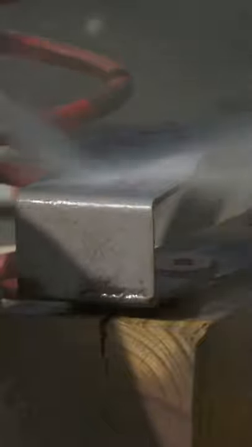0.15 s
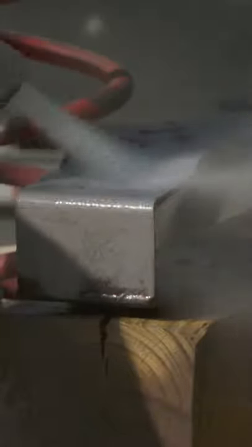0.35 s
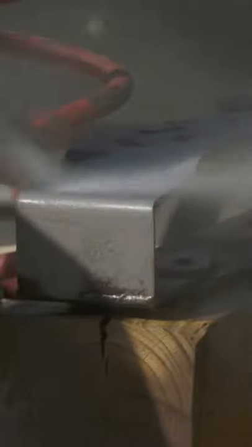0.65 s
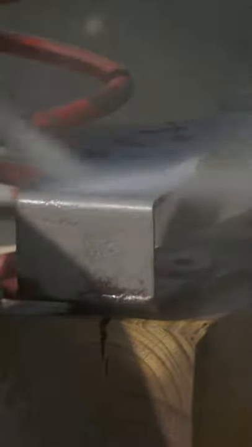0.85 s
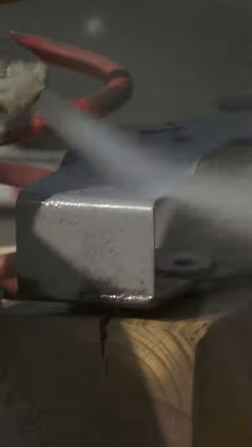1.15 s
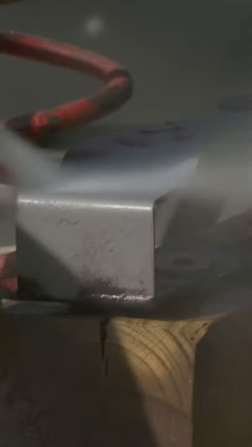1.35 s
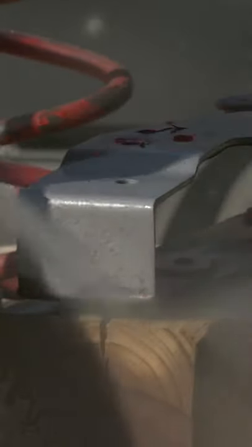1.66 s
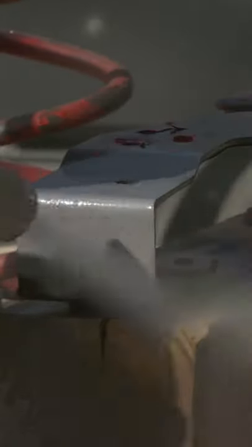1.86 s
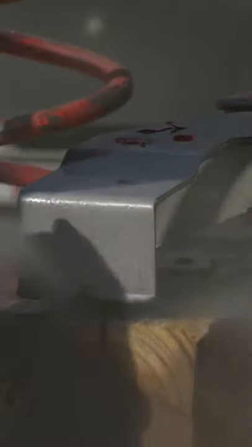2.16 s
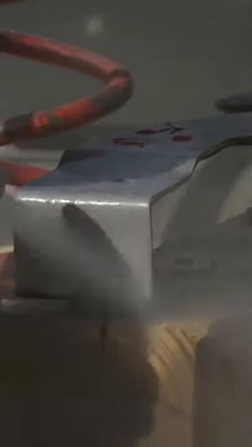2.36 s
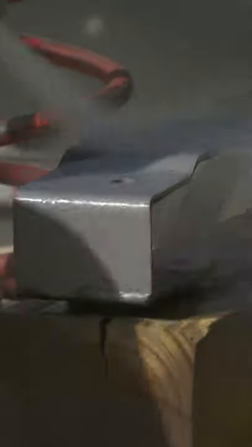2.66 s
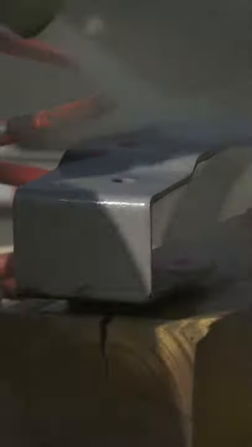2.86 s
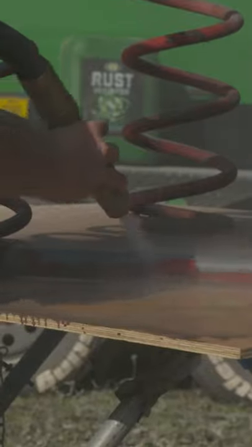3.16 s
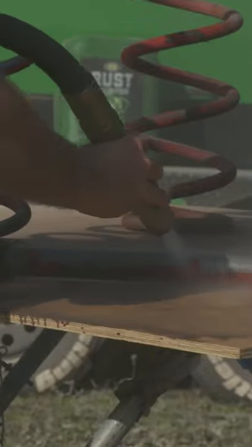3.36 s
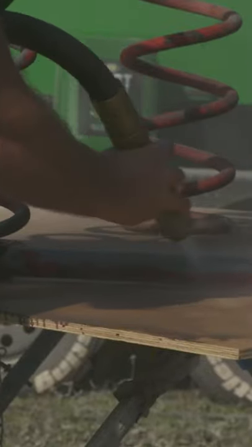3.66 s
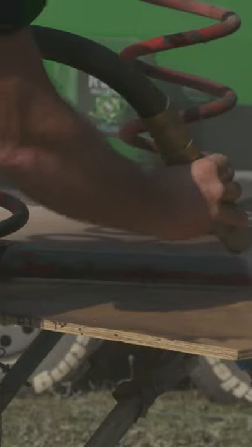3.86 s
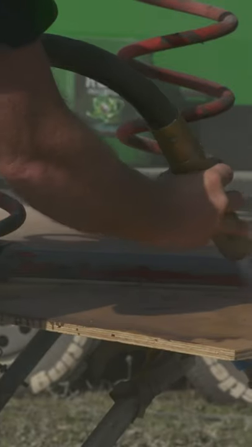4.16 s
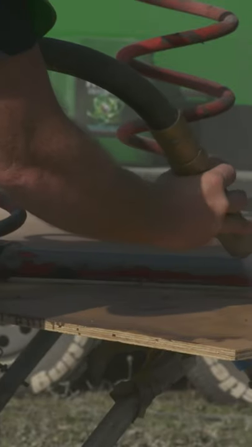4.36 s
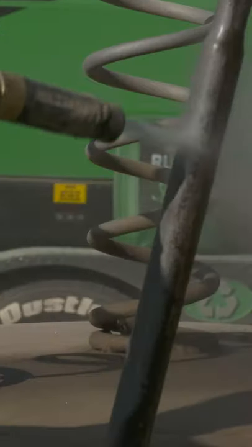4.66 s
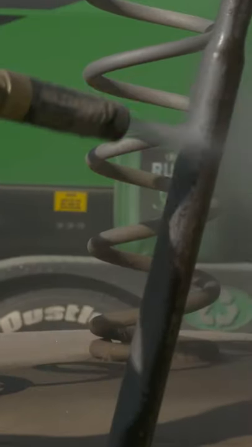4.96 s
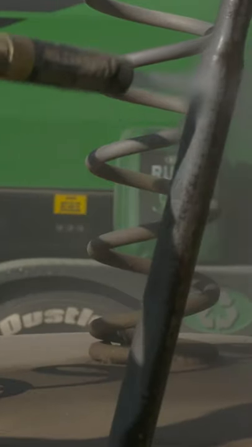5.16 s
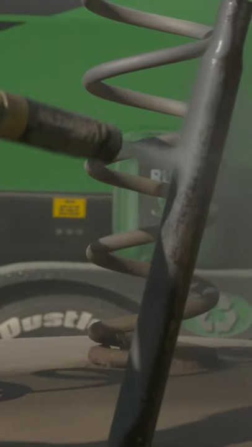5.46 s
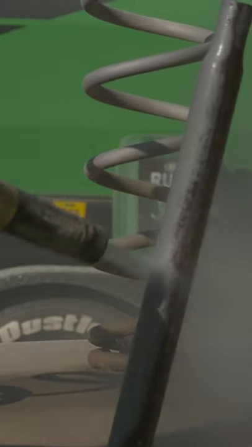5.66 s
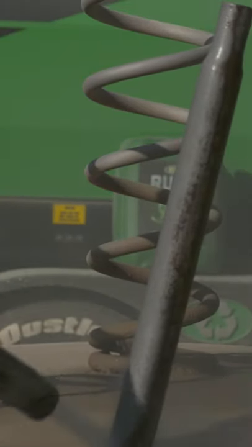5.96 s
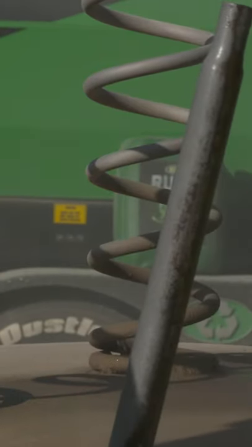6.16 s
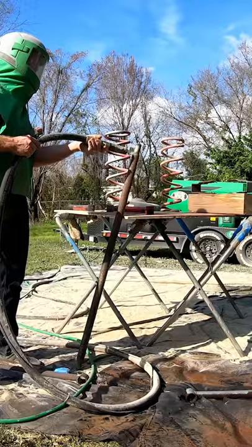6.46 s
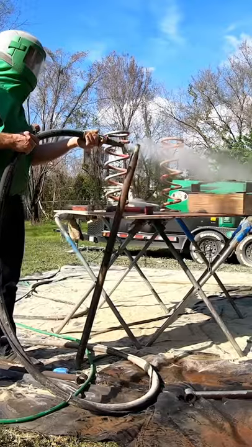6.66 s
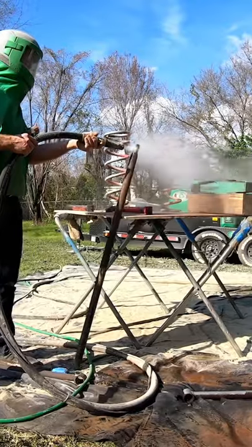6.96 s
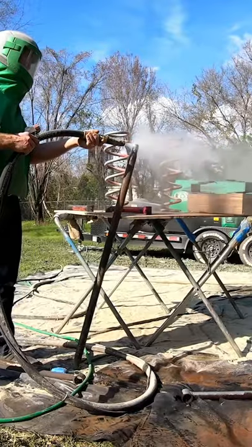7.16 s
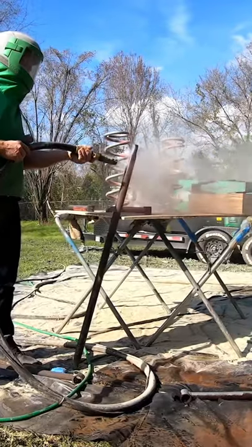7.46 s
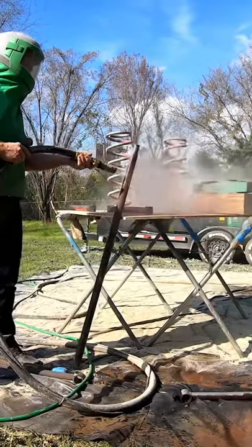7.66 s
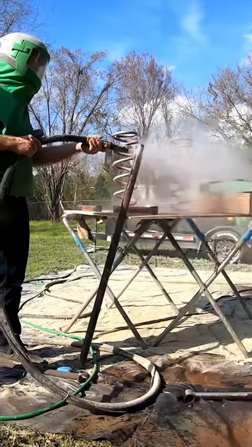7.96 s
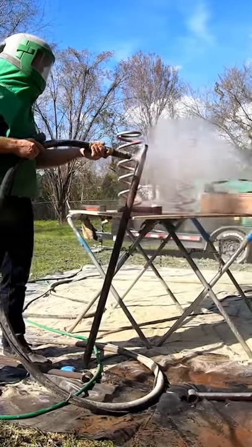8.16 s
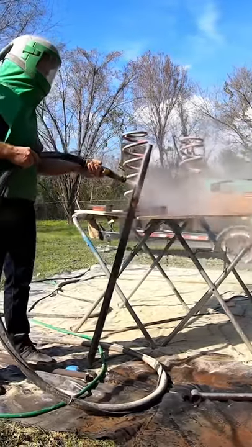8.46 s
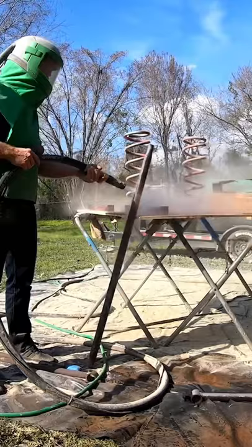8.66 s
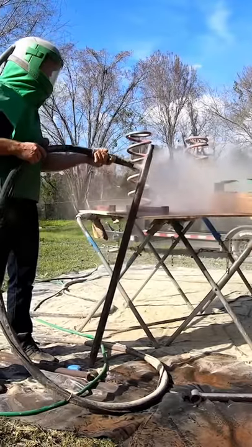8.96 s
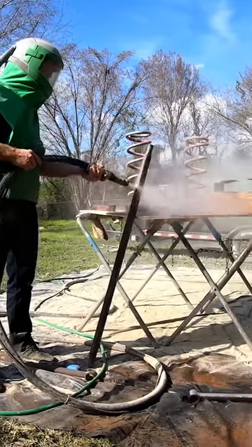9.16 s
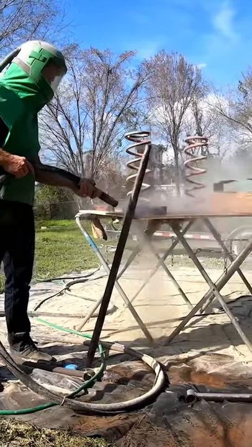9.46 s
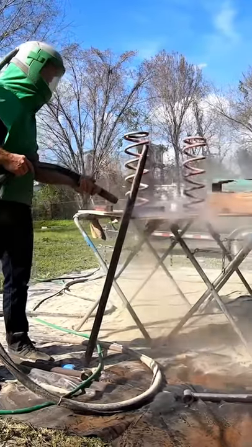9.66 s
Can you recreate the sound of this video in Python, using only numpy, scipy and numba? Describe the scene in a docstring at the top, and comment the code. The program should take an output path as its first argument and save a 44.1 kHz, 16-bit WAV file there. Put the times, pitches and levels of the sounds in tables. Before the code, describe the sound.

Wet grit blasts steel parts outdoors. A dull, close, continuous roar with shifting hollow rings comes first, cutting abruptly at about 4.6 seconds to a thin, quieter, smooth hiss. Then a loud blast bursts in with a low rush, harsh and bright, while a compressor engine rises from idle to a steady drone. Both channels carry the same sound from one microphone.

```python
"""A nozzle blasts water and grit at steel parts outdoors, heard from changing places.
First comes a dull, close roar with ringing bands, over a thin hiss from further off; then the hiss is alone.
Last, a loud blast starts up and its compressor engine climbs from idle towards full speed, joined by a hum.
The jet and grit are flickering noise, the rings are filtered noise and the engine is mostly sine tones.
Late copies off the table top and nearby things colour the jet."""
import sys
import numpy as np
from scipy import signal
from scipy.fft import rfft, irfft, next_fast_len
from scipy.io import wavfile
from scipy.ndimage import uniform_filter1d, map_coordinates
from numba import njit

SR = 44100
rng = np.random.default_rng(int(sys.argv[2]) if len(sys.argv) > 2 else 0)


def persist_wave(psi):
    """Save psi, clipped to +-1, as 16-bit WAV."""
    counts = np.round(np.clip(psi, -1, 1) * 32767).astype(np.int16)
    wavfile.write(sys.argv[1], SR, np.atleast_2d(counts).T)


N = 432166  # length in samples
CLOSE_END_S, BLAST_START_S = 4.605, 6.412

# Level of the blast once the hose is full: start_s, level_db
BLAST_LEVEL = [(6.55, -36), (6.85, -34.7), (7.3, -35.8), (7.52, -34.5), (7.87, -36.5), (8.06, -36),
               (8.2, -34.5), (8.6, -35.3), (9.03, -33.7), (9.45, -34), (9.62, -36.3), (9.8, -35)]
# Tone colour of the nozzle jet: pitch_hz, relative_level_db_per_hz
NOZZLE_COLOUR = [(290, -47), (500, -12), (1000, -15.5), (2000, -13), (3500, -11.5), (5000, -10),
                 (7000, 0.5), (8500, 0), (10000, -1), (12500, 1), (14000, 1.5), (15700, -4.5)]
# Lower middle of the nozzle sound against its hiss: start_s, level_db
NOZZLE_RUMBLE = [(6.4, 2), (6.8, 0), (7.2, 0), (7.4, 4), (7.55, 1.5), (7.85, 5.5), (7.97, 0), (8.5, 1.5),
                 (8.62, 2), (8.75, 0), (9.3, -1.5), (9.6, 4), (9.7, 3.5), (9.8, 1.5)]
# Tone colour of the jet hitting steel: pitch_hz, relative_level_db_per_hz
SPLASH_COLOUR = [(1200, -24.5), (2200, -11), (3300, -6.5), (4300, -3), (5500, -0.5), (7000, 1), (9000, -8),
                 (12000, -30)]
# Splash as the jet sweeps on and off the steel: start_s, bright_band_db, dull_band_db
SPLASH_SWEEP = [(6.42, -10, -18), (6.47, 3, 11), (6.55, 2.5, 8), (6.77, 7.5, 4.5), (6.9, 2.5, 4),
                (7.0, 3, 3.5), (7.1, 2.5, 2), (7.2, 5.5, 1), (7.32, -1.5, 0), (7.45, 2.5, -2),
                (7.63, 5, -1), (7.87, -9, -8), (7.95, 7, 2.5), (8.08, 5, 1), (8.17, -6, -12),
                (8.28, 3, -40), (8.45, 1, -8), (8.6, 3.5, 1), (8.75, 0.5, -4.5), (9.0, -1.5, -6),
                (9.1, -3, -34), (9.35, 1, -21), (9.46, -2, -1), (9.57, 1, 5.5), (9.68, -2, 1),
                (9.8, -4, -25)]
# Echoes off the table; the splash point sweeps up and down: start_s, nozzle_delay_ms, splash_delay_ms
BLAST_ECHO_DELAYS = [(6.4, 1.32, 1.24), (7.0, 1.28, 1.22), (7.4, 1.28, 1.23), (7.67, 1.24, 1.09),
                     (8.0, 1.27, 1.23), (8.3, 1.26, 1.1), (8.6, 1.23, 0.98), (9.0, 1.26, 1.12),
                     (9.25, 1.18, 0.97), (9.5, 1.14, 1.2), (9.8, 1.2, 1.2)]
# The nozzle lip sings faintly, clearest as the air arrives: start_s, level_db
LIP_WHISTLE = [(6.41, -45), (6.47, -44), (6.52, -53), (7.0, -57), (9.8, -58)]
# The hose fills from this far below full level, after a wait, at this pace
FILL_DB, FILL_WAIT_S, FILL_PACE_S = -11, 0.029, 0.035
# Low rush of the first air: extra level, how long it holds, pace of its decay
SURGE_DB, SURGE_HOLD_S, SURGE_PACE_S = 13.5, 0.077, 0.093


def blast():
    """Air drives grit out of the nozzle; the splash swells as the jet sweeps on and off the steel."""
    fill_db = FILL_DB * settling(BLAST_START_S + FILL_WAIT_S, FILL_PACE_S)
    blast_db = columns(BLAST_LEVEL)[0] + fill_db
    surge_db = SURGE_DB * settling(BLAST_START_S + SURGE_HOLD_S, SURGE_PACE_S)
    rumble_db = columns(NOZZLE_RUMBLE)[0] + surge_db
    bright_db, dull_db = columns(SPLASH_SWEEP)
    nozzle_ms, splash_ms = columns(BLAST_ECHO_DELAYS)

    def nozzle_moves(hz):
        return blast_db + rumble_db * bump(hz, 1270, 1.95)

    def splash_moves(hz):
        bright = bright_db * bump(hz, 5600, 0.41)
        dull = dull_db * bump(hz, 2870, 0.57)
        return blast_db + bright + dull

    nozzle_grit = grit(scatter_db=2.37, sputter_db=1.15)
    nozzle = spray(nozzle_grit, NOZZLE_COLOUR, nozzle_moves, flicker_db=-0.05)
    splash_grit = grit(scatter_db=1.6, sputter_db=0.9)
    splash = spray(splash_grit, SPLASH_COLOUR, splash_moves, flicker_db=1.0)
    nozzle = echoed(nozzle, nozzle_ms, share=0.62, turn=1.6, top_hz=4400)
    splash = echoed(splash, splash_ms, share=0.61, turn=0.4, top_hz=6400)
    jet = scattered(nozzle + undb(-6) * splash, share=0.13, drift_ms=0.124)

    whistle_hz = 12400 * undb(0.08 * walk(4.3))  # the pitch wavers slightly
    whistle = level(svf(rng.standard_normal(N), whistle_hz, 350.), 0)
    return jet + whistle * undb(*columns(LIP_WHISTLE))


# Levels of the close roar: start_s, low_ring_db, middle_ring_db, high_ring_db, broad_roar_db
CLOSE_LEVELS = [(0.0, -58, -49, -63, -46), (0.3, -45.5, -46.5, -53, -48), (0.76, -52.5, -52, -54, -45.5),
                (0.92, -50.5, -48, -51, -47), (1.1, -47.5, -52, -62, -45.5), (1.4, -53.5, -48, -55, -46),
                (1.55, -51, -50, -58, -44.5), (1.7, -50.5, -51, -72, -43), (1.85, -47, -56, -63, -44.5),
                (2.0, -48, -53, -55, -44), (2.14, -52, -49, -51, -45.5), (2.32, -54, -56, -65, -44),
                (2.47, -46, -62, -68, -46), (2.7, -50.5, -48.5, -57, -45.5),
                (2.9, -47.5, -50.5, -60, -46.5), (3.08, -45.5, -58, -53, -45), (3.22, -48.5, -68, -58, -45),
                (3.4, -49, -68, -53.5, -45.5), (3.65, -51.5, -75, -58, -44.5),
                (3.82, -53.5, -54, -46, -46.5), (4.2, -58, -59, -47, -48), (4.44, -54, -56, -45.5, -45.5),
                (4.6, -54, -60, -46, -48)]
# Tone colour of the broad roar: pitch_hz, relative_level_db_per_hz
CLOSE_COLOUR = [(15, -48), (25, -21), (124, -10.5), (273, -8), (522, -15), (783, -6.5), (1020, -9.5),
                (1390, -0.5), (2090, -4.5), (2650, -3.5), (4940, -3), (5840, -6), (7600, -12.5),
                (9880, -44), (16700, -120)]
# Level of the bass: start_s, level_db
CLOSE_BASS = [(0, -41.5), (0.4, -43), (0.95, -41), (1.3, -42), (1.9, -45.5), (2.45, -45.5), (2.6, -41.5),
              (3.1, -45.5), (3.4, -40.5), (3.7, -41), (4.0, -44.5), (4.6, -43)]
# Band near 2 kHz against the roar: start_s, level_db
CLOSE_MIDDLE = [(0, -1), (1.45, -1), (1.65, 3), (2.35, 2), (2.6, -3), (3.0, -1), (3.6, 1), (3.8, -2),
                (4.6, -2)]
# A dark line near 5 kHz: start_s, depth_0_to_1
CLOSE_DARK_LINE = [(0, .15), (2.85, .15), (3.0, .75), (3.45, .7), (3.6, .2), (4.6, .25)]
# Centres of the rings: start_s, low_hz, middle_hz, high_hz
RING_CENTRES = [(0.0, 3000, 3800, 5490), (1.4, 2800, 3800, 5640), (1.75, 2520, 3950, 5700),
                (2.35, 2600, 3750, 5600), (2.6, 2780, 3520, 5400), (3.1, 2740, 3600, 5950),
                (3.65, 2740, 3450, 6000), (3.85, 2660, 4030, 6120), (4.6, 2650, 4000, 6090)]
# Width of each of the two filters that make a ring, for the low, middle, high and faint ring: width_hz
RING_WIDTHS = [1370, 1390, 1470, 1070]
# The faint ring starts at this level and fades steadily
FAINT_RING_HZ, FAINT_RING_DB, FAINT_FADE_DB_PER_S = 4750, -56, 6.5


def close_roar():
    """Grit drums the parts near by: four broad rings over a roar with no top."""
    *ring_db, roar_db = columns(CLOSE_LEVELS)
    faint_db = FAINT_RING_DB - FAINT_FADE_DB_PER_S * np.arange(N) / SR
    bass_db, = columns(CLOSE_BASS)
    middle_db, = columns(CLOSE_MIDDLE)
    depth, = columns(CLOSE_DARK_LINE)

    def moves(hz):
        bass = (bass_db - roar_db) * bump(hz, 270, 1.74)
        middle = middle_db * bump(hz, 1950, 0.4)
        return roar_db + bass + middle

    hits = grit(scatter_db=2.5, sputter_db=1.28)
    roar = spray(hits, CLOSE_COLOUR, moves, flicker_db=0.9)
    centres = *columns(RING_CENTRES), np.full(N, float(FAINT_RING_HZ))
    for hz, width, db in zip(centres, RING_WIDTHS, (*ring_db, faint_db)):
        wander_db = 1.3 * walk(22)
        ring = svf(svf(hits, hz, float(width)), hz, float(width))
        roar = roar + level(ring, 0) * undb(db + wander_db)
    roar = roar - depth * svf(roar, np.full(N, 4930.), 300.)
    roar = scattered(roar, share=0.028, drift_ms=0.11)
    return signal.sosfilt(signal.butter(10, 7000, fs=SR, output="sos"), roar)


# Level of the treble of the far hiss: start_s, level_db
FAR_LEVEL = [(0.0, -48), (0.7, -47), (0.95, -48.5), (1.12, -44), (1.2, -53), (1.32, -46), (1.45, -50),
             (1.56, -44), (1.74, -45.5), (1.83, -51), (1.93, -44.5), (2.3, -41.5), (2.51, -46.5),
             (2.57, -55), (2.7, -49.5), (2.8, -53), (2.91, -46), (2.97, -51.5), (3.25, -48), (3.55, -45.5),
             (3.9, -49), (4.4, -47), (4.7, -48.5), (5.7, -50), (6.2, -50.5), (6.4, -50.5)]
# Tone colour of the far jet: pitch_hz, relative_level_db_per_hz
FAR_COLOUR = [(90, -56), (130, -49), (500, -19), (1000, -17.5), (2000, -10.5), (4000, -8.5), (6000, -3.5),
              (7500, -1), (9300, 0.5), (10900, -1), (12500, -0.5), (14500, 3), (15700, -3.5)]
# Topmost treble against the rest: start_s, level_db
FAR_TOP_TREBLE = [(0, -12), (0.65, -16), (2.2, -14), (3.0, -12), (3.7, -8), (5.6, -3.5), (6.1, -11),
                  (6.4, -6)]
# A narrow dark line in the far hiss: start_s, pitch_hz, depth_0_to_1
FAR_DARK_LINE = [(0, 11500, .6), (0.4, 10900, .4), (1.5, 11100, .2), (2.5, 10300, .3), (3.0, 10200, .5),
                 (4.0, 10700, 0.5), (5.0, 10900, 0.6), (6.4, 11200, .5)]
# Echo off the table: start_s, delay_ms, share_0_to_1
FAR_TABLE_ECHO = [(4.6, 1.55, .15), (5.1, 1.5, 0.35), (5.3, 1.62, 0.3), (5.5, 1.45, .25), (5.75, 1.35, .4),
                  (6.0, 1.18, .28), (6.25, 0.98, 0.4), (6.4, 1.1, .3)]
FAR_MIDDLE_DB = -49  # the middle keeps near this level while the treble swings


def far_hiss():
    """The jet from further off: thin, smooth, mostly treble."""
    treble_db, = columns(FAR_LEVEL)
    top_db, = columns(FAR_TOP_TREBLE)

    def moves(hz):
        top = top_db * bump(hz, 16440, 0.44)
        held_middle = (FAR_MIDDLE_DB - treble_db) * bump(hz, 2400, 1.4)
        return treble_db + top + held_middle

    jet = spray(grit(scatter_db=2.0, sputter_db=0.87), FAR_COLOUR, moves, flicker_db=1.0)
    line_hz, depth = columns(FAR_DARK_LINE)
    depth = np.clip(depth + 0.16 * walk(2.6), 0, 0.9)
    jet = jet - depth * svf(jet, line_hz, 800.)
    jet = scattered(jet, share=0.074, drift_ms=0.12)
    return echoed(jet, *columns(FAR_TABLE_ECHO), turn=0.046, top_hz=5000)


# Strength of the shaft tones before the canopy colours them: cycles_per_shaft_turn, level_db
SHAFT_ORDERS = [(1, -24), (2, -13), (4, -17.5), (5, -5.5), (6, -9), (7, -1.5), (8, -2), (9, -3.5), (10, -8),
                (11, -6.5), (12, -5), (13, -9), (14, -13), (15, -8.5)]
# Where the canopy booms: pitch_hz, level_db
CANOPY_BOOM = [(140, -8), (175, -2), (205, -20), (250, -8), (300, 0), (410, -1), (460, -11), (510, -28)]
# Engine noise between the shaft tones: pitch_hz, relative_level_db_per_hz
CLATTER_COLOUR = [(30, -21), (70, -10), (150, -4.5), (250, -4), (350, -2), (440, -1.5), (500, -24.5),
                  (700, -13.5), (900, -58)]
FULL_HZ = 131.5  # firing rate at full speed


def engine(fire_hz):
    """The engine fires three times a turn; other shaft tones and clatter boom in the canopy. Both have rms 1."""
    shaft_hz = fire_hz * (1 + 0.002 * walk(6)) / 3
    turn = 2 * np.pi * np.cumsum(shaft_hz) / SR
    # at low speed the cylinders fire alike, so overtones of the firing rate stand out
    even_db = 3.7 * np.clip((FULL_HZ - fire_hz) / 44, 0, 1)
    canopy = CANOPY_BOOM + [(600, -60)]  # and little above
    boom = 0
    for k, order_db in SHAFT_ORDERS:
        canopy_db = shape(k * fire_hz / 3, canopy)
        tone_db = order_db + even_db * (k % 3 == 0) + canopy_db + 0.78 * walk(8)
        boom = boom + undb(tone_db) * np.sin(k * turn + rng.uniform(0, 2 * np.pi))
    clatter = spray(rng.standard_normal(N), CLATTER_COLOUR, lambda hz: 0, flicker_db=-1.5)
    firing = np.sqrt(2) * np.sin(3 * turn)
    return firing, level(level(boom, 0) + level(clatter, -2.5), 0)


DRONE_FROM_S, DRONE_HZ, DRONE_DB = 7.0, 207.7, -58.5


def drone():
    """A hum once the air flows: one steady pitch whose level wanders a little."""
    gain = undb(DRONE_DB + 1.0 * walk(4.5))
    hum = np.sqrt(2) * np.sin(2 * np.pi * DRONE_HZ * np.arange(N) / SR)
    return gain * hum * between(DRONE_FROM_S, 10, 0.1)


# Springs, tubes and boxes on the table scatter the jet this late: delay_ms
NEARBY_DELAYS = [1.9, 2.301, 2.7, 3.9]


def scattered(x, share, drift_ms):
    """Faint copies off things near the jet, whose paths drift as it moves: shifting streaks in the treble."""
    i = np.arange(N)
    copies = 0
    for ms in NEARBY_DELAYS:
        delay = (ms + drift_ms * walk(1.45)) * SR / 1000
        copies = copies + np.interp(i - delay, i, x)
    return (x + share * copies) / np.sqrt(1 + len(NEARBY_DELAYS) * share ** 2)


def echoed(x, delay_ms, share, turn, top_hz):
    """Add the late, duller copy off the table top, its phase turned (radians) at the bounce: a moving comb."""
    size = next_fast_len(N)
    hz = np.arange(size // 2 + 1) * SR / size
    # long waves bend round the table and short ones scatter off the grit on it
    passed = hz ** 4 / (hz ** 4 + 800. ** 4) / (1 + (hz / top_hz) ** 4)
    dull = irfft(rfft(x, size) * np.exp(1j * turn) * passed, size)
    late = map_coordinates(dull, [np.arange(N) - delay_ms * SR / 1000], order=3)
    return x + share * late


def grit(scatter_db, sputter_db):
    """Dense grain impacts of scattered size, made of noise; the wet flow sputters."""
    size_db = scatter_db * np.minimum(rng.exponential(size=N), 5)
    sputter = np.clip(walk(70), -1.5, 1.5)
    return rng.standard_normal(N) * undb(size_db + sputter_db * sputter)


def spray(source, colour, moves, flicker_db):
    """Colour the source; each half-octave band follows moves(hz) in dB and flickers alone."""
    size = next_fast_len(N)
    hz = np.arange(size // 2 + 1) * SR / size
    spectrum = rfft(source, size) * undb(shape(hz, colour))
    spectrum /= np.sqrt(np.mean(irfft(spectrum, size) ** 2))
    place = 2 * np.log2(np.maximum(hz, 125) / 125)  # half octaves above 125 Hz
    first, last = (int(2 * np.log2(max(row[0], 125) / 125)) for row in (colour[0], colour[-1]))
    out = 0
    for k in range(first, min(last + 2, 15)):
        overlap = np.clip(1 - np.abs(place - k), 0, 1)
        band = irfft(spectrum * overlap, size)[:N]
        out = out + band * undb(moves(125 * 2 ** (k / 2)) + flicker_db * walk(14))
    return out


@njit
def svf(x, hz, width):
    """State-variable band-pass with a moving centre, gain 1 there."""
    y, b, l = np.empty(len(x)), 0., 0.
    for i in range(len(x)):
        g, k = np.tan(np.pi * hz[i] / SR), width / hz[i]
        v = (b + g * (x[i] - l)) / (1 + g * (g + k))
        b, l, y[i] = 2 * v - b, l + 2 * g * v, k * v
    return y


def bump(hz, centre_hz, octaves):
    """Share 0-1 of a control that reaches the band at hz."""
    return np.exp(-(np.log2(hz / centre_hz) / octaves) ** 2)


def shape(hz, table):
    """Level in dB of a spectrum at hz, in straight lines on a log axis."""
    f, db = np.transpose(table)
    return np.interp(np.log(np.maximum(hz, 1)), np.log(f), db)


def columns(table):
    """Every column of a timed table, sample by sample."""
    s, *rest = np.transpose(table)
    return [np.interp(np.arange(N) / SR, s, c) for c in rest]


def walk(rate):
    """Random levels held for 1 / rate s and smoothed twice; spread near 1."""
    k = int(SR / rate)
    steps = np.repeat(rng.standard_normal(N // k + 1), k)
    return 1.3 * uniform_filter1d(uniform_filter1d(steps, k), k)[:N]


def settling(start_s, pace_s):
    """1 until start_s, then dying away exponentially."""
    return np.exp(-np.maximum(np.arange(N) / SR - start_s, 0) / pace_s)


def between(t0, t1, fade_s=0.0011):
    """Gain 1 from t0 to t1 (seconds) with short fades."""
    t = np.arange(N) / SR
    return np.clip(np.minimum(t - t0, t1 - t) / fade_s, 0, 1)


def undb(db):
    """Gain of a level in dB."""
    return 10 ** (np.asarray(db) / 20)


def level(x, db):
    """x at the given rms level."""
    return x * undb(db) / np.sqrt(np.mean(x ** 2))


# Engine during the blast: start_s, firing_tone_db, casing_band_db
ENGINE_LEVELS = [(6.42, -44, -39.5), (6.46, -41.5, -36.5), (6.51, -42, -41), (6.68, -52, -51),
                 (7.01, -48.5, -47), (7.32, -49.5, -45.5), (7.37, -62, -46), (7.42, -55, -45),
                 (7.52, -47, -45.5), (7.7, -50, -46), (9.8, -54.5, -45)]
# The engine idles, then closes in on full speed
IDLE_HZ, CLIMB_FROM_S, CLIMB_PACE_S = 86.76, 6.75, 0.62


def scene():
    """Close roar over the far hiss, the hiss alone, then the blast with its engine and hum."""
    t = np.arange(N) / SR
    climb_hz = FULL_HZ - (FULL_HZ - IDLE_HZ) * settling(CLIMB_FROM_S, CLIMB_PACE_S)
    firing, boom = engine(np.where(t < BLAST_START_S, FULL_HZ, climb_hz))
    firing_db, boom_db = columns(ENGINE_LEVELS)
    thin_boom = signal.sosfilt(signal.butter(4, 200, "high", fs=SR, output="sos"), boom)

    loud = blast() + undb(firing_db) * firing + undb(boom_db) * boom + drone()
    close = close_roar() + undb(-71.5) * firing + undb(-76) * boom
    far = far_hiss() + undb(-100) * firing + undb(-79.0) * thin_boom

    mono = close * between(-1, CLOSE_END_S)
    mono = mono + far * between(-1, BLAST_START_S)
    mono = mono + loud * between(BLAST_START_S, 10)
    return np.array([mono, mono])


TOP_HZ = 15750


def record(dry):
    """One microphone on both channels; a steep low-pass cuts the top."""
    return signal.sosfilt(signal.ellip(12, 0.2, 85, TOP_HZ, fs=SR, output="sos"), dry)


dry = scene()
out = record(dry)
persist_wave(out)
```